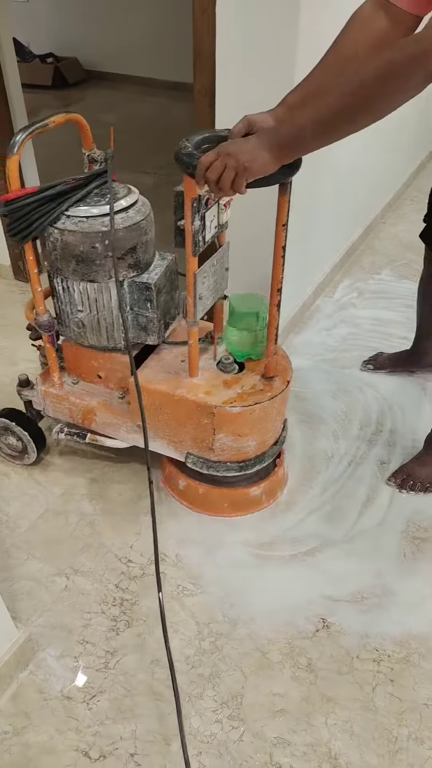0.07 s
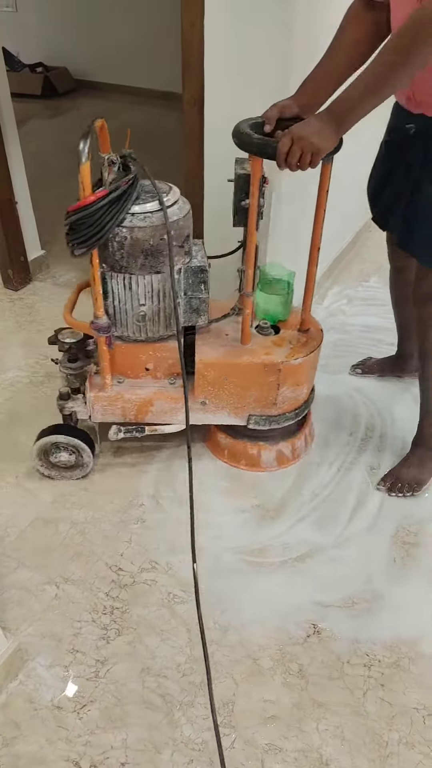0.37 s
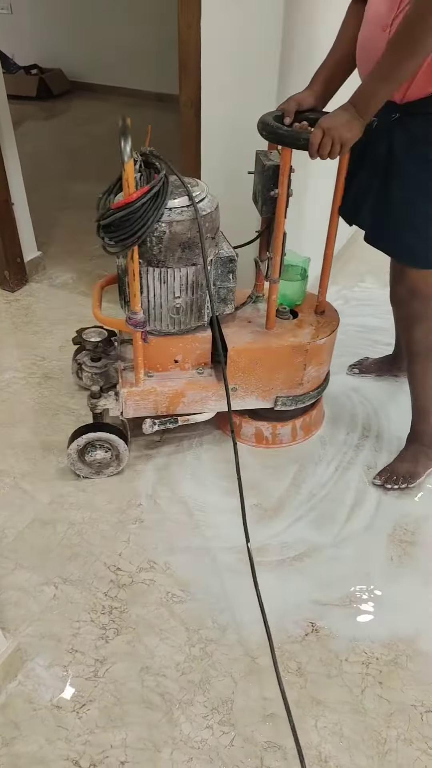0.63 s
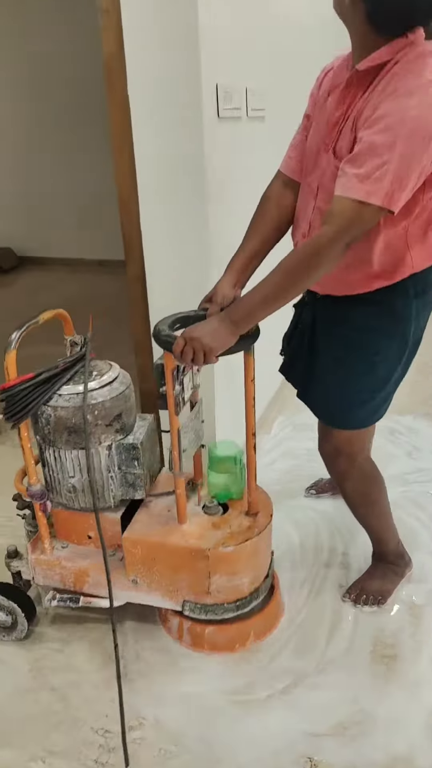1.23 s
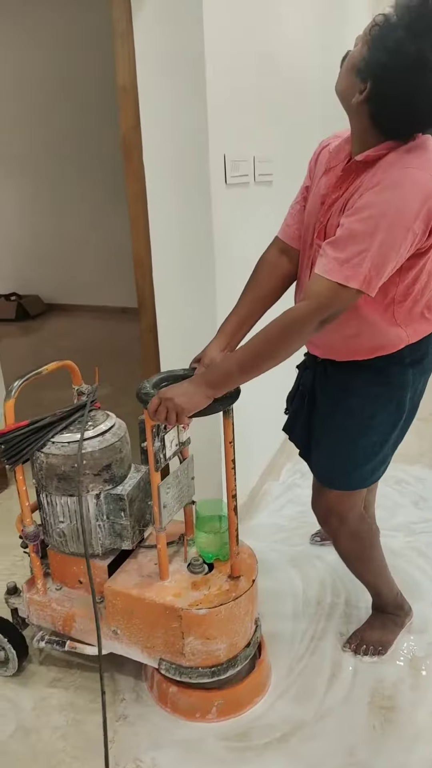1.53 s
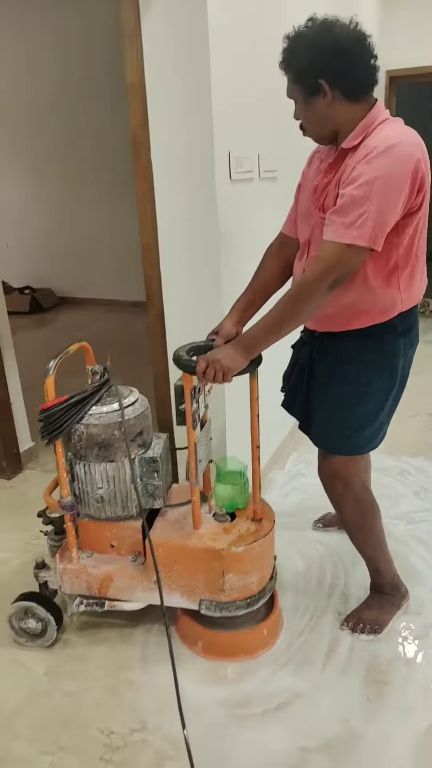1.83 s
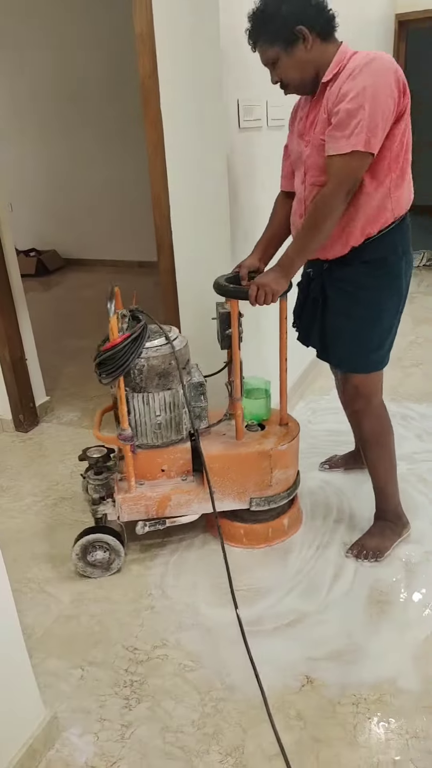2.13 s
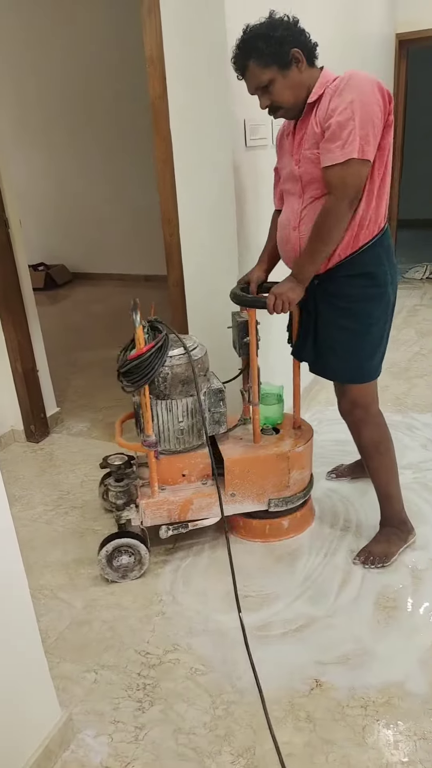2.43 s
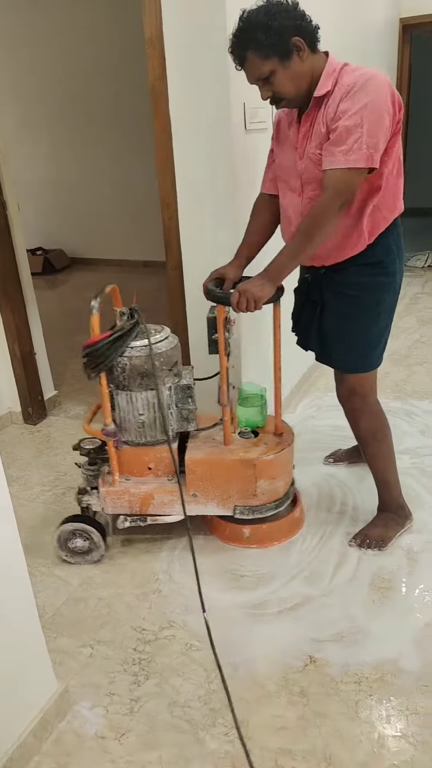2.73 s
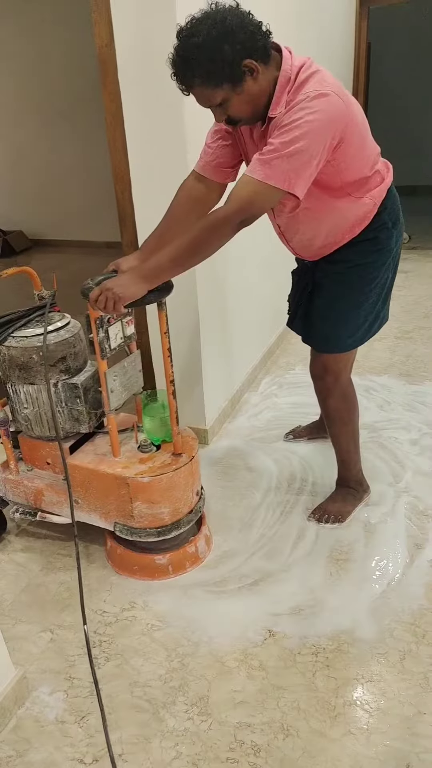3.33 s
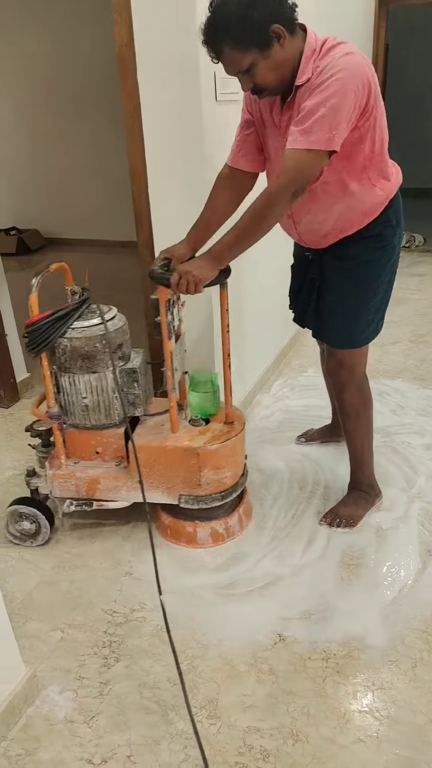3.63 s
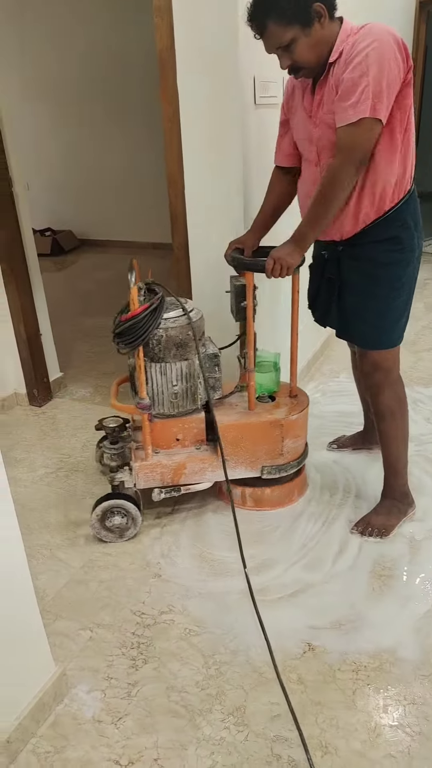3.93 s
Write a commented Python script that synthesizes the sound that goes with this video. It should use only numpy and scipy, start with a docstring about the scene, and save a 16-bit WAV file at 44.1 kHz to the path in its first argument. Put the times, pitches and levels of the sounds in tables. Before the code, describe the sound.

An electric floor polisher drones and hisses steadily over a wet stone floor indoors.

```python
"""A belt-driven floor polisher grinds wet stone in a bare room.
The stones squeal for the first 0.3 s. Throughout, the rubbing head makes the housing drone, throbbing
once a turn, over a hiss of slurry and grit; each lap of the belt brings a tick and dull knocks.
The whining drive sags with the load near 1 s and 2 s. At 2.2 s a hard tick pings the metal.
From 2.9 s the housing is shoved and groans three times."""
import sys
import numpy as np
from scipy import signal
from scipy.fft import rfft, irfft
from scipy.io import wavfile
from scipy.ndimage import uniform_filter1d

SR = 44100
rng = np.random.default_rng(int(sys.argv[2]) if len(sys.argv) > 2 else 0)


def digitize_waveform(pressure):
    """Quantize a signal to 16-bit integers and store it at the path in sys.argv[1].

    Rows of a 2-D input are taken as channels; values are limited to [-1, 1].
    """
    field = np.atleast_2d(pressure).T
    bounded = np.clip(field, -1, 1)
    quanta = np.round(bounded * 32767).astype(np.int16)
    wavfile.write(sys.argv[1], SR, quanta)


N = 176400
TIME_S = np.arange(N) / SR

# wet grinding hiss: freq_hz, relative_density_db
HISS_SPECTRUM = [(30, 0.5), (60, -5.5), (120, 5.5), (300, -1), (450, 6), (800, 7.5), (1250, 0),
                 (1800, -2.5), (3100, -4), (4200, -10.5), (5300, -14.5), (7200, -11.5), (8400, -18.5),
                 (9500, -12.5), (11800, -19), (13500, -15.5), (15000, -28.5)]
# hiss balance: freq_hz, pan_db (positive is left)
HISS_BALANCE = [(100, 0), (800, 0.4), (1400, 1.8), (3300, 3.5), (4800, 3), (6200, 6), (7900, -4), (9500, 0),
                (12500, 2.5), (15000, 1)]
# hiss left-right likeness: freq_hz, correlation
HISS_CORRELATION = [(60, 0.83), (250, 0.93), (500, 0.89), (1000, 0.013), (4000, 0), (14000, 0)]
# coarse grains under the head: start_s, level_db, rise_s
GRAIN_CRUNCHES = [(.67, -38, .04), (1.44, -27, 0.0061), (2.107, -23, 0.003), (3.159, -22, 0.0023),
                  (3.818, -28, 0.0022)]
# falling squeal of the stones: time_s, pitch_hz, level_db
STONE_SQUEAL = [(0, 4250, -31), (.11, 4220, -38), (.15, 3990, -34), (.23, 3980, -38.5), (.32, 4000, -65)]
# belt joint, once a lap: start_s, scuff_db, ping_db
BELT_TICKS = [(.139, -36.5, -48), (.66, -28.5, -32), (1.188, -35, -45), (1.713, -28.5, -35),
              (2.239, -31, -15.5), (2.765, -29.5, -36), (3.29, -31.5, -42), (3.817, -29, -38)]
# metal scuffed by the joint: freq_hz, width_hz, gain_db
SCUFF_MODES = [(3450, 690, 3.5), (5660, 1300, 4), (8240, 470, 1), (8990, 440, 1), (11160, 520, 3.5),
               (13200, 3100, 4)]
# metal pinged by a hard tick: freq_hz, width_hz, gain_db
METAL_PING_MODES = [(7320, 410, -0.5), (10040, 1400, -9), (13100, 1400, -6)]
# dull belt knocks: peak_s, level_db
BELT_KNOCKS = [(0.276, -17), (0.402, -14.5), (.803, -18), (0.939, -21), (1.458, -15.5), (1.851, -16.5),
               (1.99, -19), (2.384, -16), (2.509, -15.5), (2.902, -15), (3.033, -18), (3.56, -17),
               (3.957, -19)]
# frame shudders as the head drags: start_s, level_db
FRAME_SHUDDERS = [(.425, -28), (.825, -29), (.91, -25.5), (1.49, -27), (2.395, -25.5), (3.33, -25.5),
                  (3.575, -25)]
# drive speed, as the pitch of its top whine: time_s, pitch_hz
DRIVE_SPEED = [(0, 8303), (.7, 8335), (1.0, 7922), (1.3, 8238), (1.47, 8304), (1.7, 8110), (2.03, 7761),
               (2.25, 8065), (2.72, 8376), (3.0, 8230), (3.2, 8102), (3.58, 8170), (4, 8025)]
# drive whines at mean speed: pitch_hz, width_hz, level_db, pan_db
DRIVE_WHINES = [(2741, 53, -33, 5), (4684, 37, -44, 4), (8190, 36, -43, -19)]
# brief flares of the whines: peak_s, boost_db
WHINE_CHIRPS = [(.052, 8.5), (.349, 7), (.762, 6.5), (.84, 4), (1.098, 6), (2.112, 10), (2.465, 10.5),
                (2.74, 3), (2.995, 10), (3.05, 8), (3.105, 4.5), (3.26, 9), (3.38, 5), (3.545, 5),
                (3.603, 9), (3.67, 6), (3.96, -2)]
# steady thin ringing of the metal: freq_hz, width_hz, level_db, pan_db
METAL_SINGING = [(11160, 130, -52.5, -6)]
# shoves on the housing: start_s, level_db
HOUSING_GROANS = [(2.92, -17.5), (3.325, -18.5), (3.835, -22)]
# weaker housing resonances: freq_hz, width_hz, level_db, correlation, pan_db
HOUSING_MODES = [(195.3, 39, -34, 0.59, -2.5), (361, 106, -27, 0.65, 5.5), (533, 87, -28.5, .6, -7.5),
                 (697, 97, -40, 0.3, -9), (967, 130, -29, 0.31, 0), (1018, 53, -33, 0.071, 5)]
# hollow upper ring of the housing: time_s, level_db
RING_LEVEL = [(0, -25), (.15, -18.5), (.55, -22.5), (1.15, -26.5), (1.3, -20.5), (1.37, -25.5),
              (1.52, -14.5), (1.62, -25.5), (1.92, -22), (2.8, -25.5), (4, -23.5)]
# housing drone before surges and throb: time_s, level_db
DRONE_LEVEL = [(0, -14), (.1, -25), (.28, -16.5), (.39, -17), (.8, -15), (1.08, -19), (1.22, -12.5),
               (1.36, -13.5), (1.46, -18), (2.2, -19), (2.3, -13.5), (2.42, -18.5), (2.8, -17.5),
               (2.93, -24), (3.05, -20.5), (3.28, -23), (3.36, -25), (3.5, -24.5), (3.6, -16), (3.76, -20),
               (4, -16.5)]
# drone surges as the stones bite: peak_s, boost_db
DRONE_SURGES = [(.383, 5.5), (.556, 5), (.738, 7), (.96, 5), (1.025, 7), (1.132, 6), (1.503, 3),
                (1.705, 4.5), (2.07, 5), (2.335, 4.5), (2.54, 5.5), (3.005, 10.5), (3.08, 5), (3.202, 10.5),
                (3.285, 6.5), (3.66, -1), (3.945, -0.5)]


def from_db(db):
    """Decibels to gain."""
    return 10 ** (np.asarray(db) / 20)


def unit_rms(x):
    """Scale to unit power."""
    return x / np.sqrt(np.mean(x ** 2) + 1e-20)


def curve(rows):
    """Interpolate (time_s, value) rows at every sample."""
    return np.interp(TIME_S, *np.transpose(rows))


def at_hz(rows, hz):
    """Interpolate (freq_hz, value) rows on a log-frequency axis."""
    freq_hz, value = np.transpose(rows)
    return np.interp(np.log(hz), np.log(freq_hz), value)


def pan(db):
    """Stereo gains, left over right by db."""
    return unit_rms(from_db(np.array([[db], [-db]]) / 2))


def stereo_noise(correlation):
    """Two correlated white noises."""
    mid, side = rng.standard_normal((2, N))
    return (np.sqrt(1 + correlation) * mid + np.sqrt(1 - correlation) * side * [[1], [-1]]) / np.sqrt(2)


def band(x, edges_hz):
    """Band-pass, unit power."""
    return unit_rms(signal.sosfilt(signal.butter(2, edges_hz, "band", fs=SR, output="sos"), x))


def resonance(hz, width_hz, correlation=0):
    """Noise through a resonator, twice for steep skirts; unit power."""
    r = np.exp(-np.pi * width_hz / np.sqrt(np.sqrt(2) - 1) / SR)
    section = [1 - r, 0, r - 1, 1, -2 * r * np.cos(2 * np.pi * hz / SR), r * r]
    return unit_rms(signal.sosfilt([section, section], stereo_noise(correlation)))


def drift(rate_hz):
    """Slow random motion, unit power."""
    freq_hz = np.arange(N // 2 + 1) * SR / N
    return unit_rms(irfft(rfft(rng.standard_normal(N)) / (1 + (freq_hz / rate_hz) ** 2), N))


def swells(events, rise_s):
    """Envelope: each (start_s, level_db) event peaks after rise_s, then decays."""
    envelope = np.zeros(N)
    for start_s, level_db in events:
        age = np.clip((TIME_S - start_s) / rise_s, 0, 20)
        envelope += from_db(level_db) * age * np.exp(1 - age)
    return envelope


def flares(events, sigma_s):
    """Unity gain with a bell curve at each (peak_s, boost_db) event."""
    return from_db(sum(db * np.exp(-((TIME_S - peak_s) / sigma_s) ** 2 / 2) for peak_s, db in events))


def friction_tone(hz, width_hz, correlation, evenness=0, settle_s=0.084):
    """Pitch and strength flutter, but the rubbing holds its average level; unit power."""
    offset_hz = np.fft.fftfreq(N, 1 / SR)
    noise = stereo_noise(correlation) + 1j * stereo_noise(correlation)
    flutter = np.fft.ifft(np.fft.fft(noise) / (1 + (offset_hz / width_hz) ** 2))
    flutter /= np.sqrt(np.mean(abs(flutter) ** 2, axis=0)) ** evenness
    flutter /= np.sqrt(uniform_filter1d(np.mean(abs(flutter) ** 2, axis=0), size=int(settle_s * SR)))
    carrier = np.exp(2j * np.pi * np.cumsum(hz * np.ones(N)) / SR)
    return unit_rms((flutter * carrier).real)


def speed():
    """Drive speed relative to its mean."""
    pitch_hz = curve(DRIVE_SPEED)
    return pitch_hz / pitch_hz.mean()


def throb(depth, turn_hz=10.76, peak_s=0.035):
    """Gain that pulses once per turn of the head."""
    return 1 + depth * np.cos(2 * np.pi * turn_hz * (TIME_S - peak_s))


def room(x, t60_s=0.098, gap_s=0.012, gain_db=-9):
    """Short diffuse tail from the bare walls."""
    t = TIME_S[:SR // 2]
    tail = rng.standard_normal((2, len(t))) * from_db(-60 * t / t60_s) * (t > gap_s)
    tail = unit_rms(tail) / np.sqrt(len(t))
    return from_db(gain_db) * signal.fftconvolve(x, tail, axes=1)[:, :N]


def slurry(level_db=-21, flicker_db=1.86, treble_hz=2500):
    """Stones hiss on the wet floor; each band flickers, and the treble sinks as the drive slows."""
    edges_hz = np.r_[np.geomspace(22, 4700, 22), np.linspace(5500, 15900, 14)]
    treble_gain = speed() ** 4.1
    hiss = 0
    for low_hz, high_hz in zip(edges_hz, edges_hz[1:]):
        hz = np.sqrt(low_hz * high_hz)
        density_db = at_hz(HISS_SPECTRUM, hz) + flicker_db * drift(rate_hz=18.4)
        gain = from_db(density_db) * np.sqrt(high_hz - low_hz) * (treble_gain if hz > treble_hz else 1)
        noise = band(stereo_noise(at_hz(HISS_CORRELATION, hz)), (low_hz, high_hz))
        hiss += gain * pan(at_hz(HISS_BALANCE, hz)) * noise
    return from_db(level_db) * unit_rms(hiss)


def grit(grains_per_s=600, spread_db=3, fine_db=-37):
    """Fine grains crack at random under the head; a few coarse ones crunch."""
    sizes = from_db(spread_db * np.minimum(rng.exponential(1, (2, N)), 4))
    signs = rng.choice([-1, 1], (2, N))
    cracks = rng.random(N) < grains_per_s / SR
    fine = band(sizes * signs * cracks, edges_hz=(1660, 7100))
    crunches = sum(swells([(start_s, db)], rise_s) for start_s, db, rise_s in GRAIN_CRUNCHES)
    coarse = crunches * band(stereo_noise(0), edges_hz=(2900, 3960))
    return pan(db=4) * (from_db(fine_db) * fine + coarse)


def stone_squeal():
    """The stones catch and squeal briefly."""
    rows = np.array(STONE_SQUEAL)
    pitch_hz, level_db = curve(rows[:, :2]), curve(rows[:, ::2])
    return friction_tone(pitch_hz, width_hz=110, correlation=0) * from_db(level_db)


def belt_ticks():
    """The belt joint scuffs and pings metal for a few milliseconds."""
    start_s, scuff_db, ping_db = np.transpose(BELT_TICKS)
    scuff = sum(from_db(db) * resonance(hz, width_hz) for hz, width_hz, db in SCUFF_MODES)
    ping = sum(from_db(db) * resonance(hz, width_hz) for hz, width_hz, db in METAL_PING_MODES)
    scuff *= swells(zip(start_s, scuff_db), rise_s=0.0023)
    ping *= swells(zip(start_s, ping_db), rise_s=0.0014)
    return pan(db=-1) * (scuff + ping)


def belt_knocks(sigma_s=0.0027):
    """Each knock is one soft push of air."""
    pushes = np.zeros(N)
    for peak_s, level_db in BELT_KNOCKS:
        u = np.clip((TIME_S - peak_s) / sigma_s, -10, 10)
        pushes += from_db(level_db) * (1 - u ** 2) * np.exp(-u ** 2 / 2)
    return pushes


def frame_shudders():
    """The dragging head shakes the frame."""
    tone = friction_tone(hz=120, width_hz=41, correlation=0.98, evenness=0.6)
    return tone * swells(FRAME_SHUDDERS, rise_s=0.027)


def drive(flutter_db=0.8):
    """Rough whines follow the speed in pitch and level and flare in chirps; metal sings above them."""
    lowest, *upper = [from_db(db) * pan(pan_db) * friction_tone(hz * speed(), width_hz, correlation=0.16)
                      for hz, width_hz, db, pan_db in DRIVE_WHINES]
    singing = sum(from_db(db) * pan(pan_db) * resonance(hz, width_hz)
                  for hz, width_hz, db, pan_db in METAL_SINGING)
    flutter = from_db(flutter_db * drift(rate_hz=16))
    gain = speed() ** 3.8 * flares(WHINE_CHIRPS, sigma_s=0.015) * flutter
    return lowest * gain + sum(upper) * gain ** 0.48 + singing


def housing_groans():
    """The housing groans when shoved."""
    tone = friction_tone(hz=189.5, width_hz=18, correlation=0.93, evenness=0.32)
    return tone * swells(HOUSING_GROANS, rise_s=0.018)


def housing_ring():
    """Rubbing excites a hollow ring and weaker resonances, throbbing lightly."""
    ring = friction_tone(hz=631.4, width_hz=39, correlation=0.45) * from_db(curve(RING_LEVEL))
    modes = sum(from_db(db) * pan(pan_db) * resonance(hz, width_hz, correlation)
                for hz, width_hz, db, correlation, pan_db in HOUSING_MODES)
    return (ring + modes) * throb(depth=0.068)


def housing_drone(base_hz=284.1, left_lag_s=0.00015, undertone_db=-9.5):
    """The rubbing head excites the main mode and a lower one; both surge as the stones bite."""
    pitch_hz = base_hz * speed() ** 0.606
    left, right = friction_tone(pitch_hz, width_hz=16.7, correlation=0.94, evenness=0.4)
    tone = np.array([np.interp(TIME_S - left_lag_s, TIME_S, left), right])
    undertone = from_db(undertone_db) * resonance(hz=247.3, width_hz=27.4, correlation=0.85)
    gain = from_db(curve(DRONE_LEVEL)) * flares(DRONE_SURGES, sigma_s=0.012) * throb(depth=0.17)
    return pan(db=-2.5) * (tone + undertone) * gain


def scene():
    """The running machine; only ticks and grit echo in the room."""
    sharp = belt_ticks() + grit()
    housing = housing_drone() + housing_ring() + housing_groans()
    machine = housing + slurry() + drive() + stone_squeal() + belt_knocks() + frame_shudders()
    return machine + sharp + room(sharp)


def record(dry):
    """Steep low-pass."""
    cutoff_hz = 15300
    return signal.sosfilt(signal.ellip(10, 0.1, 90, cutoff_hz, fs=SR, output="sos"), dry)


dry = scene()
out = record(dry)
digitize_waveform(out)
```